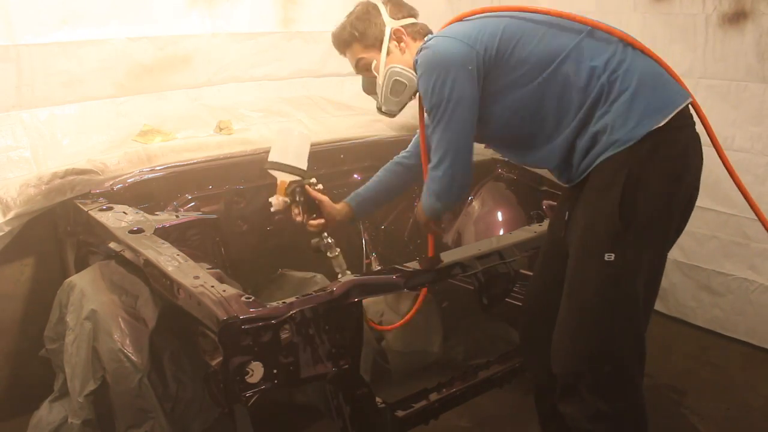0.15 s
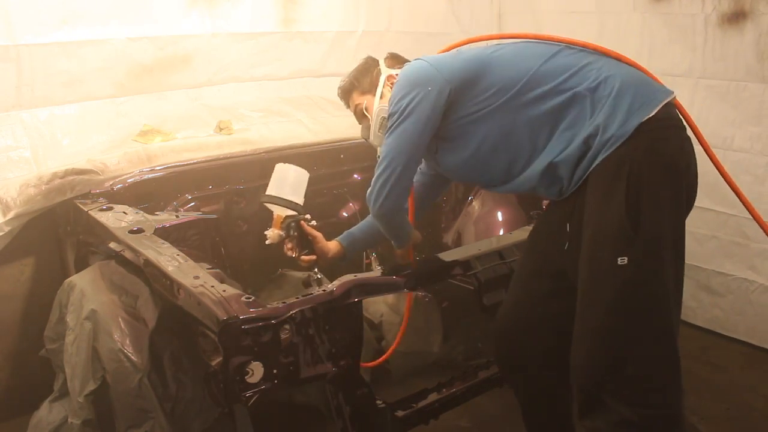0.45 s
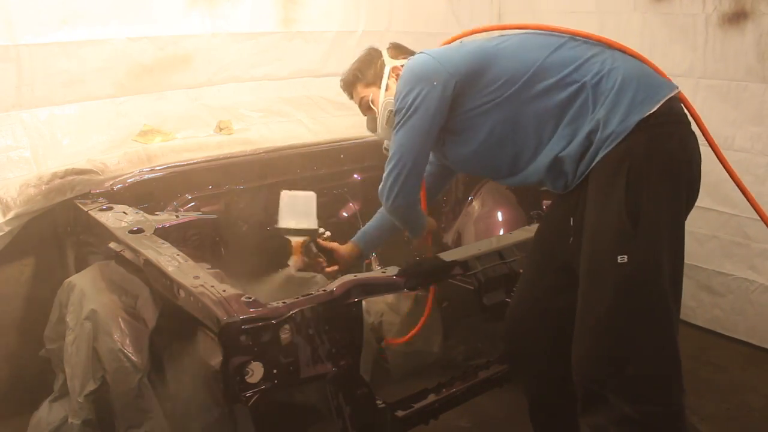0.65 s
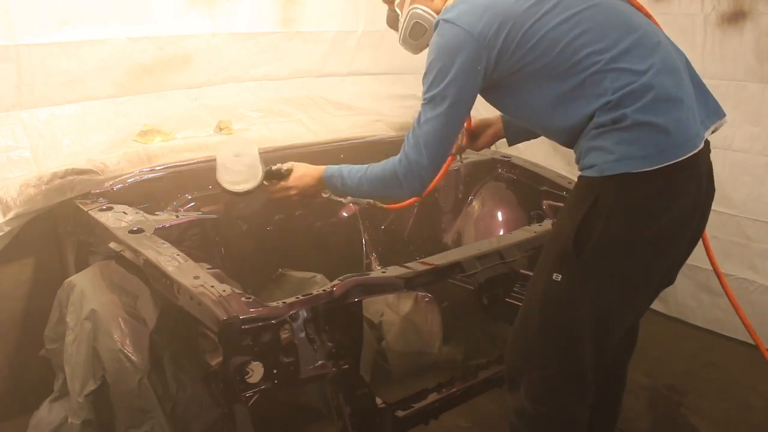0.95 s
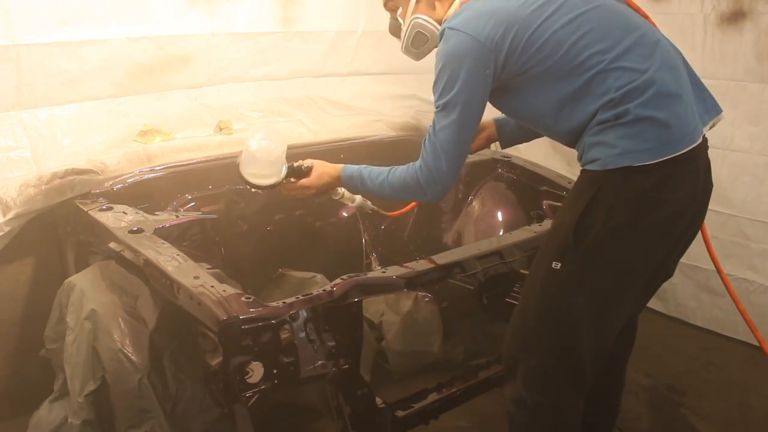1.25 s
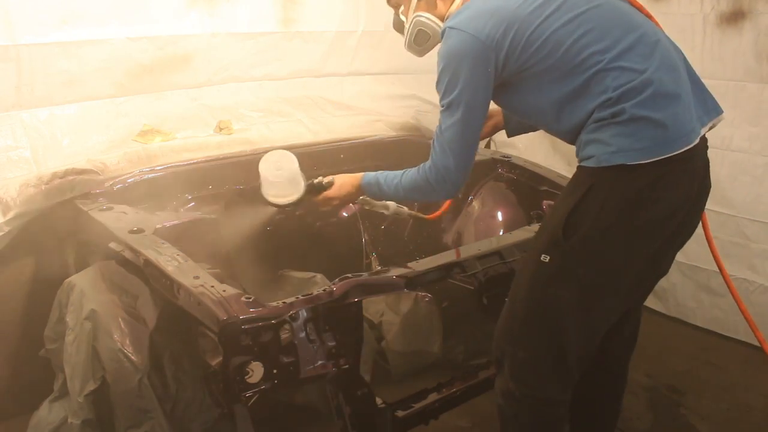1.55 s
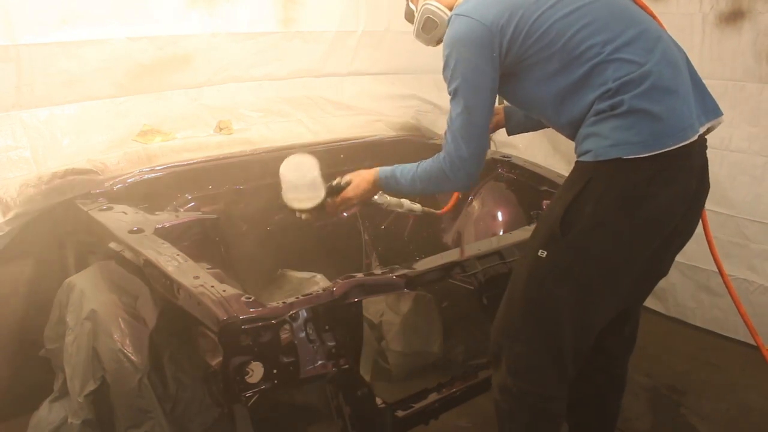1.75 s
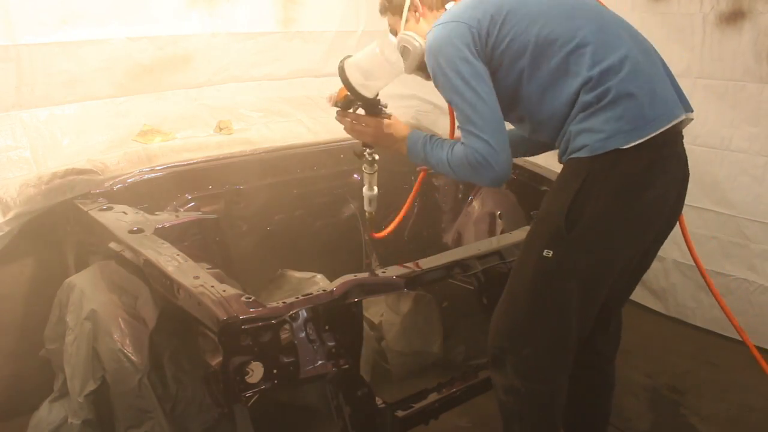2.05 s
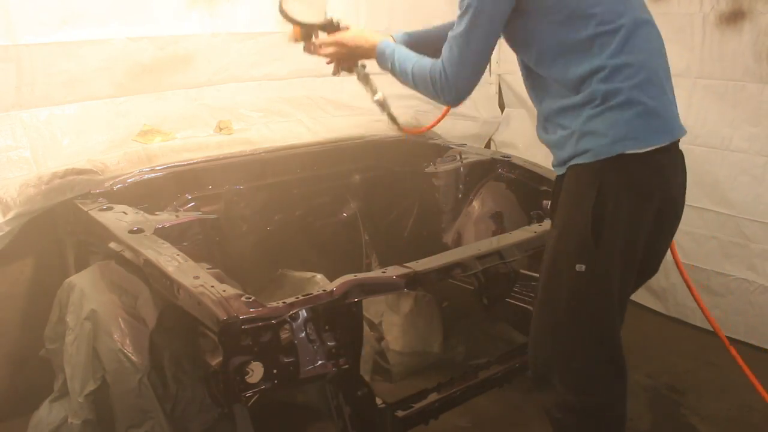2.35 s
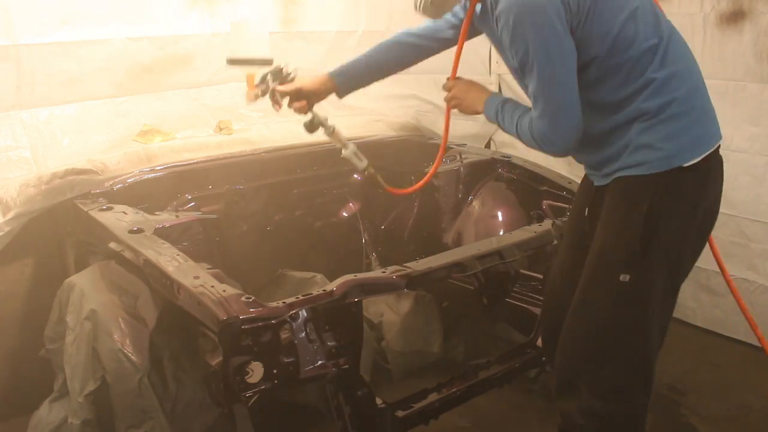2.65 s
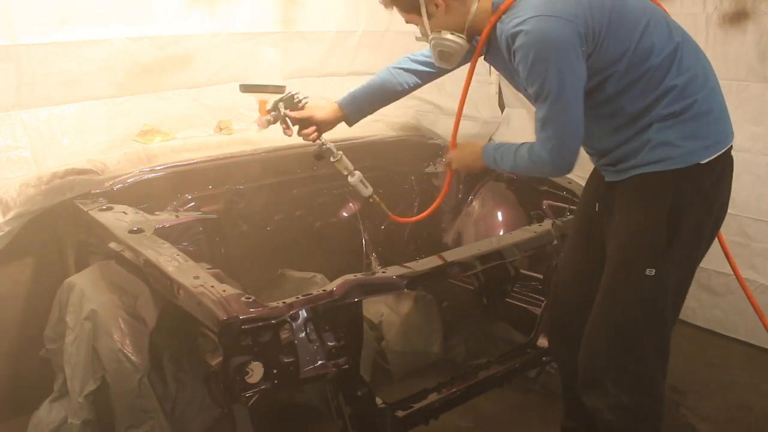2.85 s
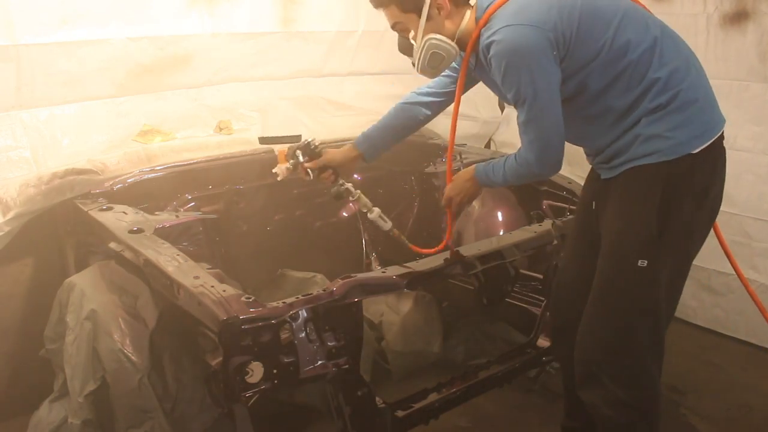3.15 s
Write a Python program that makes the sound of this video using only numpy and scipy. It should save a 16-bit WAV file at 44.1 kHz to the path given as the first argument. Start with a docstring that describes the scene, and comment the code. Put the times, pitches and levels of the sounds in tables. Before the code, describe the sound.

A spray gun hisses in two short, loud bursts over a roaring extractor fan.

```python
"""A small paint booth. The extractor fan roars through the booth's resonances and hums with unsteady tones,
while escaping air hisses from a spray gun. Two pulls of the trigger, with a light touch between them,
release a far louder, brighter turbulent jet; the first pull also whistles briefly. A gain control ducks
everything under the two pulls, and the booth swells back after each release."""
import sys
import numpy as np
from scipy import signal
from scipy.fft import rfft, irfft, next_fast_len
from scipy.io import wavfile
from scipy.ndimage import uniform_filter1d, map_coordinates

SR = 44100
rng = np.random.default_rng(int(sys.argv[2]) if len(sys.argv) > 2 else 0)


def unload_wav(signal):
    """Save mono or channel-first audio to the path in sys.argv[1] as 16-bit WAV at rate SR, clipped to [-1, 1]."""
    wavfile.write(
        sys.argv[1],
        SR,
        np.round(np.clip(np.atleast_2d(signal).T, -1, 1) * 32767).astype(np.int16),
    )


N = 145530

# Spectra of the turbulent noises. Each row: frequency in Hz, relative spectral density in dB.
ROAR_SPECTRUM = [(25, -50), (60, -35), (100, -30.5), (170, -18), (330, -13), (480, -6), (630, -8),
                 (780, 0.5), (1150, -5), (1320, -4), (1700, -3.5), (2200, -5), (3200, -10.5), (6000, -17.5)]
AIR_SPECTRUM = [(60, -60), (800, -44), (2000, -2), (3200, -0.5), (5200, 1), (7000, 0.75), (8800, -2.5),
                (11500, -4), (15500, -6)]
SIZZLE_SPECTRUM = [(1000, -70), (7000, -35), (11000, -11), (13000, -6), (15200, 2.5), (16500, -6.5)]
JET_SPECTRUM = [(30, -75), (130, -37), (400, -29), (1000, -23.5), (2400, -17), (4000, -12.5), (6500, -8.5),
                (9000, -5), (12000, -2), (15300, 0), (20000, -2)]
# Likeness of each noise at the two microphones. Each row: frequency in Hz, correlation from -1 to 1.
ROAR_CORRELATION = [(30, .6), (120, 0.9), (500, 0.93), (1200, 0.91), (2500, 0.53)]
AIR_CORRELATION = [(1000, 1), (1800, 0.99), (3000, 0.31), (4000, 0.29), (5000, 0.089), (7000, .05),
                   (8000, -0.47), (10500, -0.38), (15500, -0.12)]
JET_CORRELATION = [(300, 0.99), (3900, 1), (4700, 0.31), (6900, 0.5), (7900, -0.14), (11000, -0.15),
                   (15000, 0.47)]
# Resonances of the booth and duct. Each row: centre in Hz, width in Hz, gain in dB.
BOOTH_RESONANCES = [(175, 13, 5.5), (239, 12, 8), (444, 28, 5), (511, 25, -2), (800, 16, -2.5),
                    (870, 12, -1.5), (1033, 21, 7), (1139, 48, 6), (1198, 22, 9.5), (1423, 25, 2.5),
                    (1478, 23, 10), (1560, 25, 5), (1775, 27, 4), (1965, 40, 1)]
# Tones of the fan and duct. Each row: frequency in Hz, relative level in dB.
FAN_TONES = [(118.4, -76), (172.3, -70.5), (220.7, -65), (290.7, -62.5), (366.1, -60.5), (479.1, -59),
             (576.0, -51.5), (737.5, -54), (866.7, -55.5), (958.2, -49.5), (1109, -51), (1184, -61),
             (1448, -52.5), (1540, -67.5), (1733, -56.5)]
# Envelopes of the idle air's top treble and of the whistle. Each row: time in seconds, level in dB.
SIZZLE_ENVELOPE = [(0, -41), (.17, -45), (.27, -36.5), (.56, -38), (.95, -41), (1.03, -41), (1.08, -39),
                   (1.14, -38), (1.33, -38), (1.95, -37), (2.4, -36), (2.56, -40), (2.77, -36.5),
                   (2.92, -41.5), (3.29, -41)]
WHISTLE_ENVELOPE = [(.645, -57), (.672, -34.5), (.686, -42), (.702, -40), (.725, -45), (.78, -62)]
# Trigger pulls. Each row: start, end and opening time in seconds, level in dB without the surge.
TRIGGER_PULLS = [(0.589, .757, 0.013, -18.5), (1.06, 1.106, 0.014, -39.5), (1.357, 1.757, 0.0042, -18)]
# Balance between the microphones. Each row: frequency in Hz, left minus right level in dB.
BALANCE = [(60, -5), (170, 2), (350, 2.5), (700, 1.3), (1300, -.6), (2500, -0.7), (5000, -1.9), (15000, -2)]


def amp(db):
    """Amplitude grows tenfold for every 20 dB."""
    return 10 ** (np.asarray(db) / 20)


def unit_rms(x):
    """Normalisation brings the mean power to 1."""
    return x / np.sqrt(np.mean(x ** 2) + 1e-20)


def along(points, hz):
    """Interpolation joins (Hz, value) points on a logarithmic frequency axis."""
    knots_hz, values = np.transpose(points)
    return np.interp(np.log(hz + 1), np.log(knots_hz + 1), values)


def clock():
    """Uniform sampling gives each sample its time in seconds."""
    return np.arange(N) / SR


def wobble(knots_per_s):
    """A spline through random knots fluctuates smoothly."""
    return map_coordinates(rng.standard_normal(1024), [clock() * knots_per_s + 2], mode="wrap")


def filtered(x, response):
    """A linear filter multiplies the spectrum by its frequency response."""
    size = next_fast_len(N + SR // 4)
    return irfft(rfft(x, size) * response(np.fft.rfftfreq(size, 1 / SR)), size)[..., :N]


def turbulence(spectrum, correlation, patchy_db):
    """Turbulence radiates broadband noise, uneven in time and frequency; here in stereo, at rms 1."""
    white = signal.stft(rng.standard_normal((2, N)), nperseg=512)[2]
    patches = uniform_filter1d(rng.standard_normal(white.shape[1:]), size=7, axis=0)
    patches = unit_rms(uniform_filter1d(patches, size=14, axis=1))
    pair = signal.istft(white * amp(patchy_db * patches), nperseg=512)[1][:, :N]
    # the ratio of mid to side sets the left-right correlation
    angle = lambda hz: np.arccos(np.clip(along(correlation, hz), -1, 1)) / 2
    mid, side = filtered(pair, lambda hz: amp(along(spectrum, hz)) * [np.cos(angle(hz)), np.sin(angle(hz))])
    return unit_rms(np.array([mid + side, mid - side]))


def booth_response(hz):
    """Resonance shapes the booth's gain in a narrow band around each centre frequency."""
    return amp(sum(db / (1 + (2 * (hz - centre) / width) ** 2) for centre, width, db in BOOTH_RESONANCES))


def fan(roar_db=-39.5, drift_hz=3.02, flutter=0.27):
    """The extractor's turbulence excites the booth's resonances; its tones waver in pitch and level."""
    rush = turbulence(ROAR_SPECTRUM, ROAR_CORRELATION, patchy_db=0.9)
    roar = unit_rms(filtered(rush, booth_response)) * amp(roar_db + 0.63 * wobble(39))
    hum = np.zeros(N)
    for hz, db in FAN_TONES:
        phase = 2 * np.pi * (np.cumsum(hz + drift_hz * wobble(25.02)) / SR + rng.random())
        hum += np.sqrt(2) * amp(db - 0.38) * (1 + flutter * wobble(16)) * np.sin(phase)
    return roar + hum


def idle_air(hiss_db=-36.5):
    """Steadily escaping air hisses by turbulence; its top treble rises and falls as the gun is moved."""
    hiss = turbulence(AIR_SPECTRUM, AIR_CORRELATION, patchy_db=0.8) * amp(hiss_db + 0.75 * wobble(7.36))
    sizzle = turbulence(SIZZLE_SPECTRUM, AIR_CORRELATION, patchy_db=1.2)
    sizzle_db = np.interp(clock(), *np.transpose(SIZZLE_ENVELOPE)) + 0.56 * wobble(55)
    return hiss + sizzle * amp(sizzle_db)


def wall_echoes(x, count=8, strength=0.21, span_s=0.02):
    """Weak early reflections from the near walls colour the direct sound by interference."""
    delays = span_s * rng.uniform(0.1, 1, count)
    echoes = lambda hz: sum(np.exp(-2j * np.pi * hz * delay) for delay in delays)
    return filtered(x, lambda hz: 1 + strength / np.sqrt(count) * echoes(hz))


def whistle(pitch_hz=3340, wander_hz=55):
    """A brief, wavering whistle, probably an edge tone where the jet crosses an edge of the car body."""
    level_db = np.interp(clock(), *np.transpose(WHISTLE_ENVELOPE), left=-np.inf, right=-np.inf)
    phase = 2 * np.pi * np.cumsum(pitch_hz + wander_hz * wobble(250)) / SR
    return np.sqrt(2) * amp(level_db) * np.sin(phase)


def jet(surge_db=4.5, surge_s=0.032, closing_db_per_s=638):
    """Jet noise follows the flow: it surges on stored hose pressure, holds, and dies as the valve shuts."""
    envelope = np.zeros(N)
    for start, end, opening_s, db in TRIGGER_PULLS:
        age = np.maximum(clock() - start, 0)
        opening = np.minimum(age / opening_s, 1)
        surge = np.exp(-(age / surge_s) ** 4)
        closing_db = closing_db_per_s * np.maximum(clock() - end, 0)
        envelope += opening * amp(db + surge_db * surge - closing_db)
    return envelope * turbulence(JET_SPECTRUM, JET_CORRELATION, patchy_db=1.4)


def scene(left_lag_rad=0.14):
    """Fan and gun superpose; level and phase between the microphones set the gun a little to the right."""
    mix = fan() + wall_echoes(idle_air() + jet() + whistle())
    sides = np.array([[0.5], [-0.5]])  # left, right
    return filtered(mix, lambda hz: amp(along(BALANCE, hz) * sides) * np.exp(-1j * left_lag_rad * sides))


def record(dry):
    """Automatic gain control ducks fast, holds briefly and recovers slowly; a band limit follows."""
    threshold_db, recover_db_per_s, top_hz = -29.5, 67, 15800
    sense_s, attack_s, look_ahead_s, hold_s = 0.0025, 0.0013, 0.0006, 0.0083
    smooth = lambda x, s: signal.lfilter([1 - np.exp(-1 / (s * SR))], [1, -np.exp(-1 / (s * SR))], x)
    ahead = lambda x, s: np.interp(clock() + s, clock(), x)
    level_db = 10 * np.log10(smooth(np.mean(dry ** 2, axis=0), sense_s) + 1e-12)
    excess_db = np.maximum(level_db - threshold_db, 0)
    ramp_db = recover_db_per_s * clock()
    duck_db = np.maximum.accumulate(excess_db + ramp_db) - ramp_db  # falls no faster than the ramp
    held_db = np.maximum(ahead(duck_db, look_ahead_s), ahead(duck_db, -hold_s))
    return filtered(dry * amp(-smooth(held_db, attack_s)), lambda hz: hz < top_hz)


dry = scene()
out = record(dry)
unload_wav(out)
```